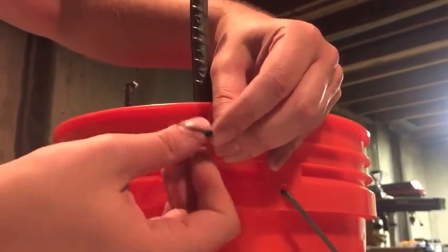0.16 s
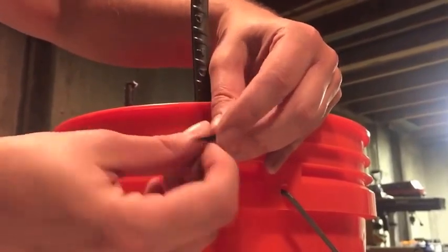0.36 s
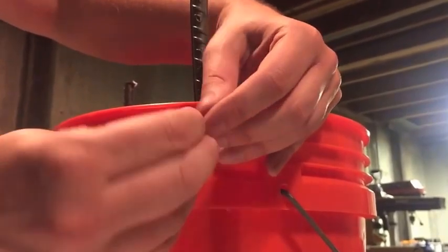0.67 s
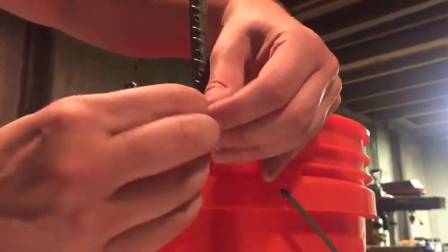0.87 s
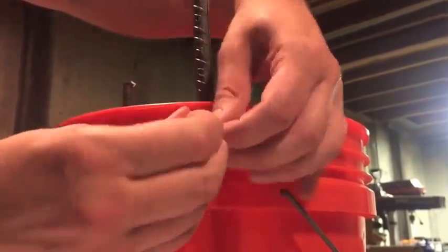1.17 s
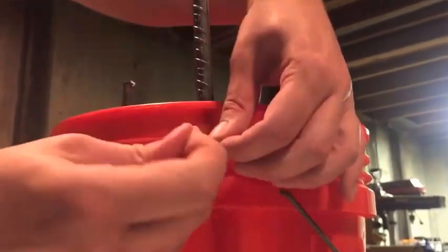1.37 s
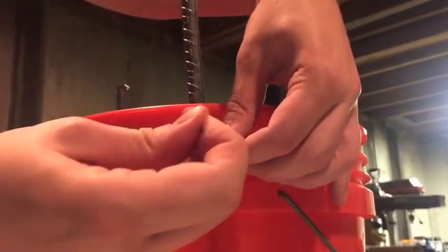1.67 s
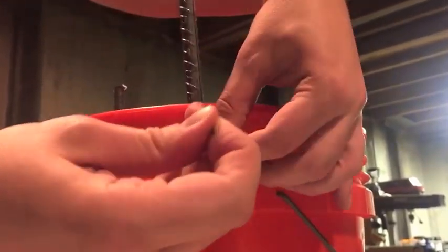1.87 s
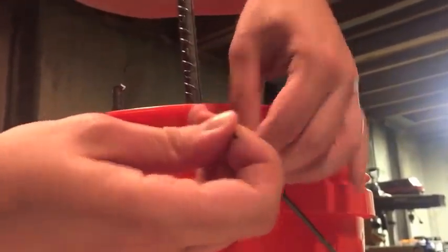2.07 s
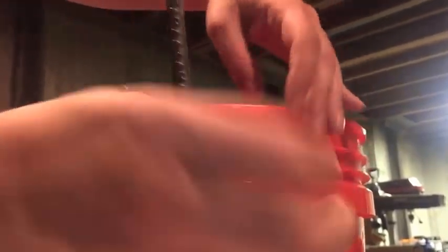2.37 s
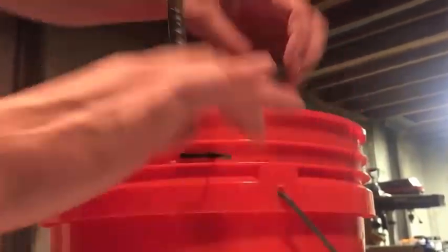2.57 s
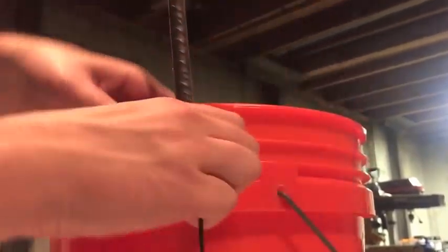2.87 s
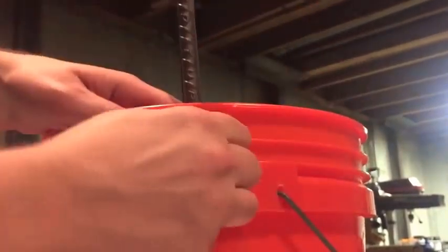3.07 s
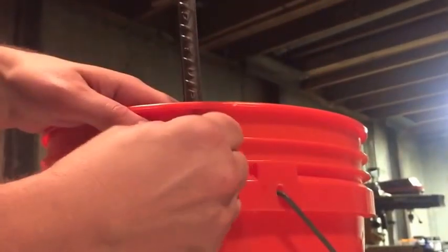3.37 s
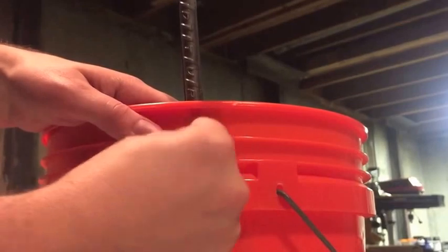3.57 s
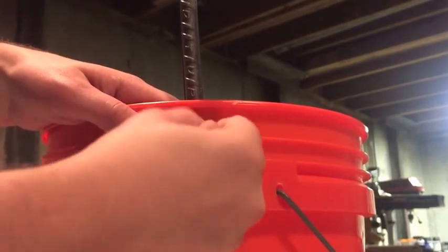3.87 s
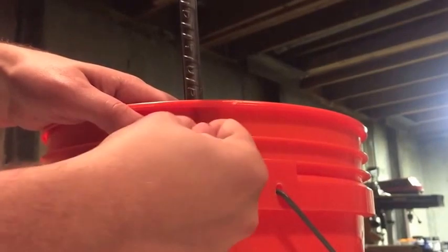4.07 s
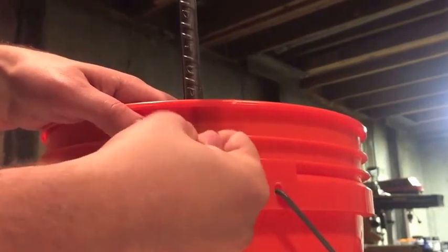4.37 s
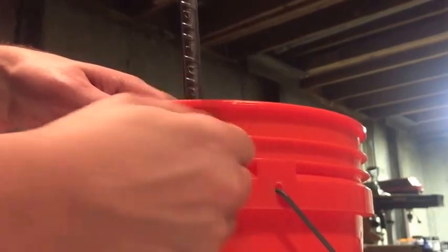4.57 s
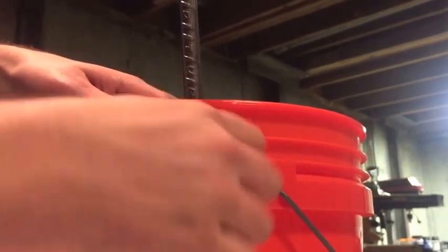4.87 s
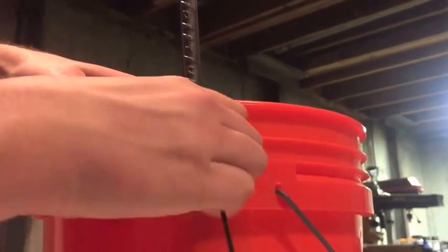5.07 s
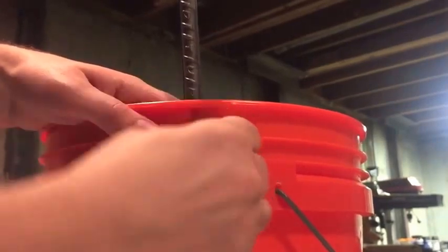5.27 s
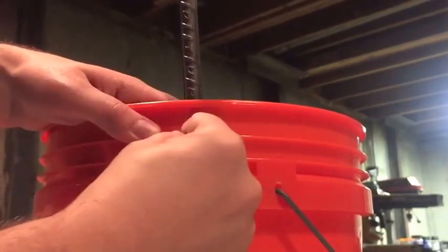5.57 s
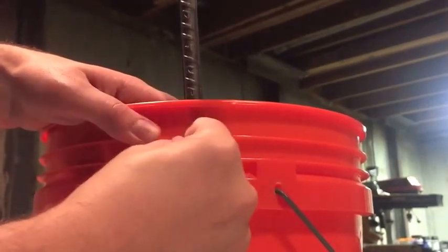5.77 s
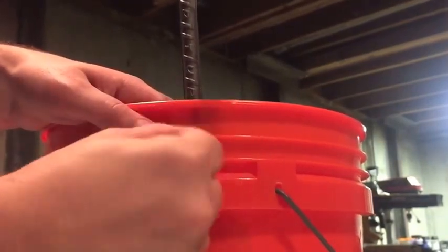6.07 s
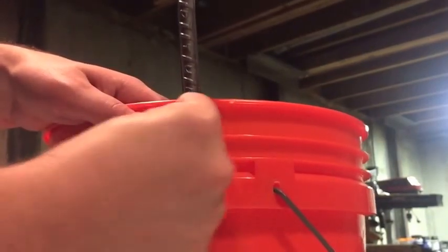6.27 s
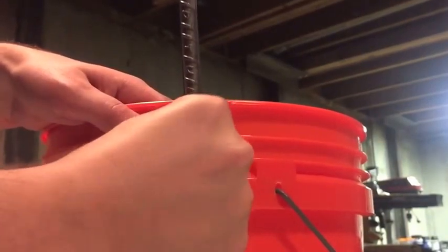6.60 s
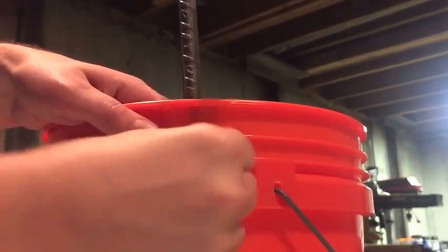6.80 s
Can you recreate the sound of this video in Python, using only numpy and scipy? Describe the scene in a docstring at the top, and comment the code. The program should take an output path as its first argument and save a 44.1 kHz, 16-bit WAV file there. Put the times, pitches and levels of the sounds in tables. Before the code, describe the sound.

Two zip ties ratchet tight on a hollow plastic bucket, one long and one short, with a pop and soft knocks in a quiet workshop.

```python
"""A quiet workshop, close up: two plastic zip ties are pulled tight round a steel bar and a bucket rim.
The pawl snaps over each tooth of the strap and shakes the plastic bucket: one long rasp on a slack
loop, later a short hard one on a tight loop. Hands press, rub, creak on and bump the bucket.
The bar knocks the wall and later clinks once; a tie pops against the rim. Faint hiss and hum behind."""
import sys
import numpy as np
from scipy import signal
from scipy.fft import rfft, irfft
from scipy.io import wavfile
from scipy.ndimage import uniform_filter1d

SR = 44100
rng = np.random.default_rng(int(sys.argv[2]) if len(sys.argv) > 2 else 0)


def generate_wav(sig):
    """Save sig (samples, or channels by samples) to the path in sys.argv[1] as 16-bit PCM at SR."""
    pcm = np.round(np.clip(np.atleast_2d(sig).T, -1, 1) * 32767).astype(np.int16)
    wavfile.write(sys.argv[1], SR, pcm)


N = 306054

# Spectra. Each row: frequency in Hz, level in dB.
AIR_SPECTRUM = [(12, -42.5), (20, -13), (43, -2), (65, -9.5), (101, -12.5), (158, -12), (527, -28.5),
                (825, -29), (1150, -29), (3160, -33), (4940, -37), (8650, -39), (10500, -42.5),
                (14300, -42), (16000, -49.5)]
PRESS_SPECTRUM = [(25, -18), (70, 7), (100, -11.5), (145, 0), (220, -1.5), (300, -17), (500, -21),
                  (900, -38), (3000, -61.5)]  # bucket flexing under a hand
RUB_SPECTRUM = [(200, -23.5), (450, 4), (660, -22.5), (920, 0.5), (1250, -7), (1600, -4.5), (2100, -12.5),
                (4000, -28.5), (16000, -50)]  # finger on the bucket
SCRAPE_SPECTRUM = [(600, -12.5), (1600, 0), (2400, 4), (3400, 2), (4500, -10), (5600, -7), (6700, -5),
                   (9000, -11.5), (10500, -16), (16000, -18)]  # finger on the strap
FLEX_SPECTRUM = [(40, -26), (110, -15), (180, -0.5), (260, -7), (340, -10.5), (600, -21.5), (1500, -36.5)]  # bucket flexing under a tooth
PAWL_SLACK_SPECTRUM = [(500, -5), (2000, -3), (3200, -18), (5500, -10.5), (7200, -10), (8000, -12),
                       (9300, -3.5), (10500, -7.5), (13000, 1), (15300, 7.5), (16200, -7.5)]
PAWL_SNUG_SPECTRUM = [(500, -16), (2400, -3.5), (3600, 3.5), (5200, -5.5), (7000, 0), (8600, -2),
                      (10500, -10), (12000, 0), (13500, 1.5), (15300, 0.5), (16200, -11)]
PAWL_HARD_SPECTRUM = [(500, -13), (2000, -17), (3500, 10), (4400, -16), (5450, 5), (5950, -9), (6400, 3),
                      (6700, 2), (7050, 11), (7600, 2), (8600, 4), (9400, 14), (10600, -6), (13000, -5),
                      (15500, -6)]
PAWL_PINNED_SPECTRUM = [(500, -9), (2000, -13), (3600, 11.5), (4400, -2), (5450, 5), (5950, -8), (6400, 10),
                        (6700, 6), (7050, 14.5), (7600, -16), (9200, 3), (10600, -4), (15500, -5)]  # no give left in the loop
WALL_SLACK_SPECTRUM = [(150, -17.5), (450, 4), (700, -11.5), (850, 7.5), (1250, 0.5), (1550, 2.5),
                       (2000, -3.5), (2500, -6), (3000, 1.5), (3700, -2), (5000, -10.5), (10000, -18),
                       (16000, -21)]  # bucket wall under a slack loop
WALL_TIGHT_SPECTRUM = [(150, -25), (450, -1), (680, -7), (900, 5), (1500, 5), (2700, 2), (3700, 2),
                       (4500, -5.5), (7000, -10.5), (11000, -15), (16000, -12)]

# Modes. Each row: frequency in Hz, level in dB, t60 in seconds.
BUCKET_MODES = [(72.2, -1, 0.28), (140.9, 3.5, 0.47), (175.2, -3, 0.11), (204.5, -1, 0.18),
                (235, -16, 0.023), (292, -6.5, 0.023), (368, -16, 0.12), (439, -11, 0.088)]
WALL_MODES = [(805.5, 7, 0.16), (938.7, 11, 0.06), (997, 4.5, 0.052), (1066, -2, 0.048), (1124, -3, 0.2),
              (1262, -5, 0.19), (1490, 5, 0.18), (1525, 5, 0.051), (1740, -9, 0.032), (2170, -2.5, 0.1),
              (2240, -1, 0.1), (2260, 1.5, 0.18), (2690, -9.5, 0.24), (3510, -11, 0.083)]
FREE_END_MODES = [(606, 1, 0.04), (1290, -1.5, 0.033)]
POP_MODES = [(870, -8.5, 0.098), (1489, 1.5, 0.027), (1670, 4, 0.017), (2670, -13, .02), (3040, -16, 0.033),
             (3255, -12.5, 0.049), (5130, -22, 0.035)]
BAR_MODES = [(585, 9, 0.025), (960, -15, 0.1), (2070, 2, 0.16), (2140, 3, 0.11), (2810, -8, 0.14),
             (4280, -1, 0.1), (4270, -1, 0.16), (4740, -10, 0.087)]

# Workshop hum. Each row: centre in Hz, width in Hz, level in dB.
HUM_BANDS = [(55, 5.9, -64), (144.6, 11, -77.5)]
# Reverberation. Each row: frequency in Hz, t60 in seconds.
ROOM_T60 = [(100, 0.73), (500, 0.16), (2000, 0.37), (5000, 0.21), (15000, 0.097)]
# Hands leaning on the bucket. Each row: start in seconds, hold in seconds, relative level in dB.
GRIPS = [(0, 0.019, -56), (1.87, 0.084, -53.5), (2.2, 0.25, -59), (2.87, 0.59, -61), (3.692, 0.23, -56),
         (4.23, 0.29, -58), (6.268, 0.38, -50)]
# Finger slides. Each row: start and length in seconds, relative level in dB, share on the strap 0-1.
SLIDES = [(0, 0.065, -70.5, 0.14), (.391, 0.041, -65.5, 0.01), (.84, 0.18, -69.5, 0),
          (2.067, 0.13, -64.5, 0.07), (2.3, 0.047, -54.5, 0.01), (2.37, 0.18, -61.5, 0),
          (2.918, 0.15, -55, 0.17), (3.277, 0.056, -66, 0.94), (3.75, 0.071, -61, 0.6),
          (6.34, 0.13, -67.5, 0.02), (4.9, 0.073, -64.5, 0.94), (5, 0.11, -69, 1), (5.411, 0.057, -68, 1),
          (5.85, 0.11, -69.5, 0.42), (6.045, 0.2, -73, 0.78), (6.17, 0.15, -66.5, 0.36),
          (6.713, 0.063, -68, 0.94), (6.88, .07, -68, 1)]
# Finger creaks, and one 2.3 kHz ring lingering after the hard pull.
# Each row: start and length in seconds, relative level in dB, start and end pitch in Hz.
CREAKS_AND_RING = [(0, 0.052, -67, 820, 820), (0.783, 0.043, -71, 1340, 1380),
                   (0.85, 0.076, -71.5, 2207, 1740), (2.09, 0.046, -66, 910, 950),
                   (2.5, 0.047, -64.5, 1582, 1498), (2.956, 0.071, -56, 1770, 1380),
                   (3.683, 0.091, -61, 2300, 2240), (4.903, 0.052, -67, 3460, 3100),
                   (4.993, 0.046, -67, 2330, 2500), (6.086, 0.021, -63.5, 9200, 8700),
                   (6.227, 0.076, -69.5, 1050, 920), (6.744, 0.022, -62.5, 1420, 1350),
                   (6.843, 0.029, -61.5, 1300, 1310)]
# Overlapping tugs of the long pull. Each row: peak time and half length in seconds,
# peak teeth per second, force on the pawl and on the bucket in dB.
TUGS = [(1.076, .019, 133, 4, -2), (1.179, .0526, 250, 4, -1), (1.289, .0462, 302, 1, 0.5),
        (1.409, .0803, 183, 2.5, 0), (1.565, .0395, 269, 7, -5.5), (1.703, .1417, 121, -3, -3),
        (1.827, .0362, 130, 8.5, 4)]
# A slow tooth sticks and lets go harder. Each row: teeth per second, gain in dB.
TOOTH_STICK = [(10, 4), (60, -1.5)]
# Bar against the wall. Each row: start in seconds, relative level in dB, centre in Hz.
BAR_KNOCKS = [(1.305, -10, 970), (1.463, -15.5, 860), (1.745, -13, 970), (2.318, -17.5, 1170)]
# Bumps on the bucket. Each row: start in seconds, relative level in dB, hardness 0-1, extra boom in dB.
BUMPS = [(2.199, -3.5, 0.28, -1.5), (2.273, -7, 0.24, -3.5), (2.468, -20.5, 0.37, -2.5),
         (3.041, -24.5, 1, -6), (2.873, -15.5, 0.34, -2), (2.927, -8.5, 0.62, -3.5),
         (2.97, -14.5, 0.55, -9), (3.031, -16, 0.57, 1), (3.185, -8, 0.09, -1.5), (3.358, -14.5, 0, 0),
         (3.545, -16, 0, 2), (4.102, -24.5, 0.58, 0.5), (4.1863, -12, 0.52, -3.5), (4.25, -12.5, 0, 1.5),
         (4.278, -15.5, 0, -0.5), (4.4914, -9, 0.59, -7), (4.5, -15, .45, -2), (4.522, -9, 0.14, 2),
         (4.558, -13.5, 0, 0.5), (5.3413, -18, 1, 0), (5.769, -21, 0.21, -3), (5.953, -10.5, 0, -1),
         (6.0018, -16.5, 0.79, 2.5), (6.286, -16, 0.3, 1), (6.376, -11.5, 0.21, 4.5),
         (6.394, -18, 0.45, 2.5), (6.505, -21, 0.51, 8), (6.649, -18.5, 0.36, 3.5), (6.736, -24, 0.55, -1),
         (6.841, -16, 0.58, -2)]
# Contacts: flesh, fingertip, nail, up to the strap's tip.
# Each row: hardness 0-1, knock centre in Hz, gains of knock, tick and boom in dB.
CONTACTS = [(0, 1190, -45.5, -51, -0.5), (.3, 910, -16, -60, 2), (.5, 1110, -13, -34.5, -0.5),
            (.6, 1450, -10.5, -18, 3.5), (1, 2080, -12.5, -11, -23)]
# Teeth of the hard pull. Each row: start in seconds, force on the pawl and on the bucket in dB.
CRACKS = [(3.4508, 0, -3.5), (3.4617, -2, -2.5), (3.4722, -2, 1), (3.4806, -4, -3), (3.4907, -2.5, -2.5),
          (3.5077, -3.5, -0.5), (3.5345, 0.5, -2), (3.549, 4, -2), (3.559, 5, -2.5), (3.568, 1, 0.5),
          (3.5791, 2.5, -1.5), (3.59, -6, 0.5), (3.601, 1.5, 0), (3.6153, -6, 0.5), (3.64, 0, -2),
          (3.6766, -4, -5.5)]
# The boom sinks as the loop pins the bucket. Each row: time in seconds, frequency in Hz.
BOOM_GLIDE = [(3.49, 250), (3.56, 168.5)]

BAND_LIMIT_HZ = 16000
CLATTER_T60_S = .045


def gain_of(db):
    return 10 ** (np.asarray(db) / 20)


def unit_rms(x):
    return x / np.sqrt(np.mean(x ** 2) + 1e-20)


def unit_energy(x):
    return x / np.sqrt(np.sum(x ** 2) + 1e-20)


def at_hz(points, hz):
    """Table lookup on a log-frequency axis."""
    f, value = np.transpose(points)
    return np.interp(np.log(hz + 1), np.log(f + 1), value)


def add(mix, start_s, sound):
    part = mix[max(round(start_s * SR), 0):][:len(sound)]
    part += sound[:len(part)]


def colour(x, spectrum, size=4096):
    """Minimum-phase filter; attacks stay sharp."""
    log_gain = np.log(gain_of(at_hz(spectrum, abs(np.fft.fftfreq(size, 1 / SR)))))
    taps = np.fft.ifft(np.exp(np.conj(signal.hilbert(log_gain)))).real[:size // 2]
    return signal.fftconvolve(x, taps)[:len(x)]


def burst(spectrum, t60_s, size=8192):
    """Dense modes struck once: decaying noise, flattened, then coloured."""
    bins = rfft(rng.standard_normal(size) * gain_of(-60 * np.arange(size) / SR / t60_s))
    bins /= np.sqrt(uniform_filter1d(abs(bins) ** 2, size=max(int(8 * size / SR / t60_s), 3)))
    fade = signal.windows.tukey(2 * size, .5)[size:]
    return unit_energy(colour(irfft(bins, size) * fade, spectrum))


def ring(modes, spread_db=0, size=8192):
    """Damped modes; strengths scatter with the place struck."""
    t, out = np.arange(size) / SR, np.zeros(size)
    for k, (hz, db, t60_s) in enumerate(modes):
        wave = unit_energy(np.sin(2 * np.pi * hz * t) * np.exp(-np.log(1000) * t / t60_s))
        out += gain_of(db + spread_db * rng.standard_normal()) * (-1) ** k * wave
    return unit_energy(out)


def snap(spectrum, t60_s, rattle, size=8192):
    """Sharp release, then a brief rattle of plastic."""
    release = unit_energy(colour(signal.unit_impulse(size), spectrum))
    return unit_energy(release + rattle * burst(spectrum, t60_s))


def soften(sound, rise_s):
    """A yielding contact builds up gradually."""
    return unit_energy(sound * -np.expm1(-np.arange(len(sound)) / SR / rise_s))


def background(hiss_above_300_hz_db=-73.5):
    """Steady hiss and wavering low hum."""
    air = colour(rng.standard_normal(N), AIR_SPECTRUM)
    air /= np.std(signal.sosfilt(signal.butter(4, 300, "high", fs=SR, output="sos"), air))
    hz, hum = np.fft.rfftfreq(N, 1 / SR), np.zeros(N)
    for centre_hz, width_hz, db in HUM_BANDS:
        band = rfft(rng.standard_normal(N)) / (1 + (2 * (hz - centre_hz) / width_hz) ** 2)
        hum += gain_of(db) * unit_rms(irfft(band, N))
    return gain_of(hiss_above_300_hz_db) * air + hum


def hand_rumble(gain_db=-2, attack_s=0.0034, release_db_per_s=126):
    """Shifting pressure rumbles the bucket; each grip comes on, holds, lets go."""
    pressure = rng.standard_normal(N)
    flex = unit_rms(colour(pressure, PRESS_SPECTRUM))
    boom = unit_rms(signal.fftconvolve(pressure, ring(BUCKET_MODES))[:N])
    t, weight = np.arange(N) / SR, np.zeros(N)
    for s, hold_s, db in GRIPS:
        attack = np.clip((t - s) / attack_s, 0, 1)
        weight += attack * gain_of(db - release_db_per_s * np.maximum(t - s - hold_s, 0))
    return gain_of(gain_db) * weight * unit_rms(flex + 0.35 * boom)


def strokes(skid_lead_s=0.022, skid_s=0.034, skid_db=-41, fidgets_per_s=2.5, fidget_db=-82.5):
    """SLIDES plus a skid at each bump and faint random fidgets."""
    skids = [(s - skid_lead_s, skid_s, db + contact(hardness)[1] + skid_db, hardness ** 2)
             for s, db, hardness, _ in BUMPS]
    fidgets = [(when * N / SR, 0.13 * (.5 + length), fidget_db, share)
               for when, length, share in rng.random((round(fidgets_per_s * N / SR), 3))]
    return SLIDES + skids + fidgets


def finger_slides(gain_db=-1, slips_per_s=2500, ribs_per_s=260, catch_s=0.013, catch_db=3.5):
    """Tiny slips ring the wall and hiss on the ribbed strap; the finger catches and lets go."""
    slipping = rng.random(N) < slips_per_s / SR
    slips = slipping * gain_of(3 * np.minimum(rng.exponential(1, N), 4)) * rng.choice([-1, 1], N)
    ringing = unit_rms(signal.fftconvolve(slips, ring(WALL_MODES))[:N])
    rub = unit_rms(unit_rms(colour(slips, RUB_SPECTRUM)) + 0.77 * ringing)
    ribs = (rng.random(N) < ribs_per_s / SR) * rng.standard_normal(N)
    scrape = unit_rms(colour(unit_rms(slips) + unit_rms(ribs), SCRAPE_SPECTRUM))
    on_bucket, on_strap = np.zeros(N), np.zeros(N)
    for s, length_s, db, share in strokes():
        swell = gain_of(db + gain_db) * unit_rms(signal.windows.tukey(int(length_s * SR), .7))
        add(on_bucket, s, np.sqrt(1 - share) * swell)
        add(on_strap, s, np.sqrt(share) * swell)
    catches = np.interp(np.arange(N) / SR / catch_s, np.arange(N), rng.standard_normal(N))
    return (on_bucket * rub + on_strap * scrape) * unit_rms(gain_of(catch_db * catches))


def resonate(x, hz, width_hz):
    """Resonance tracking the curve hz."""
    turn, r = np.exp(2j * np.pi * np.cumsum(hz) / SR), np.exp(-np.pi * width_hz / SR)
    return (turn * signal.lfilter([(1 - r) ** 2], [1, -2 * r, r * r], x / turn)).real


def creaks_and_ring(gain_db=-1, pulses_per_s=450, uneven_db=4, relative_width=0.12):
    """Uneven pulses drive two gliding resonances: stick-slip creaks, and a ring after the hard pull."""
    out = np.zeros(N)
    for s, length_s, db, start_hz, end_hz in CREAKS_AND_RING:
        swell = signal.windows.tukey(int(length_s * SR), .7)
        jitter, force, rough = rng.standard_normal((3, SR))[:, :len(swell)]
        cycles = np.maximum.accumulate(np.cumsum(pulses_per_s * (1 + 3 * jitter)) / SR)
        pulses = np.diff(np.floor(cycles), prepend=0) * gain_of(uneven_db * force) + .03 * rough
        hz, tone = np.linspace(start_hz, end_hz, len(swell)), 0
        for ratio, partial_db in [(1, 9), (2.05, -9)]:
            partial = resonate(pulses, ratio * hz, relative_width * ratio * start_hz)
            tone += gain_of(partial_db) * unit_rms(partial)
        add(out, s, gain_of(db + gain_db) * unit_rms(swell * tone))
    return out


def teeth(start_s=1.0581, end_s=1.9226):
    """Tugs sum to strap speed. Each row: seconds, teeth per second, share drawn, pawl dB, bucket dB."""
    t = np.arange(start_s, end_s, 1 / SR)
    speeds = np.array([peak * np.exp(-((t - s) / half_s) ** 2) for s, half_s, peak, *_ in TUGS])
    teeth_per_s = speeds.sum(0) + 1e-9
    pawl_db, bucket_db = np.array(TUGS)[:, -2:].T @ speeds / teeth_per_s
    passed = np.cumsum(teeth_per_s) / SR
    drawn = np.linspace(0, 1, round(passed[-1]) + 1)
    at = np.searchsorted(passed / passed[-1], drawn)
    return zip(t[at], teeth_per_s[at], drawn, pawl_db[at], bucket_db[at])


def loop_ring(slack_hz, mode_db, drawn, rise_oct=1.0, t60_s=.008, size=1024):
    """Bending modes of the loop: higher and weaker as it shrinks."""
    hz, t = slack_hz * 2 ** (rise_oct * drawn), np.arange(size) / SR
    strength = gain_of(mode_db + 4 * rng.standard_normal(len(hz))) * (-1) ** np.arange(len(hz))
    waves = (strength * (hz < BAND_LIMIT_HZ)) @ np.sin(2 * np.pi * hz[:, None] * t)
    return (1 - 0.82 * drawn) * unit_energy(waves * np.exp(-np.log(1000) * t / t60_s))


def pawl_click(loop, snug):
    """The pawl's release rings the loop; snug 0-1 shifts its colour."""
    rattle = burst([(500, 0), (16000, 0)], t60_s=.006, size=1024)
    release = signal.unit_impulse(1024) + 1.05 * loop + .5 * rattle
    slack_click = unit_energy(colour(release, PAWL_SLACK_SPECTRUM))
    snug_click = unit_energy(colour(release, PAWL_SNUG_SPECTRUM))
    return unit_energy((1 - snug) * slack_click + snug * snug_click)


def wall_response(spectrum, modes_db):
    """Dense clatter of the bucket wall plus its clearest modes."""
    clatter = burst(spectrum, CLATTER_T60_S)
    return unit_energy(clatter + gain_of(modes_db) * ring(WALL_MODES, spread_db=3.8))


def wall_shake(spots, drawn, loose_treble_db=-10):
    """The strap creeps from spot to spot on the wall; a loose loop passes on little treble."""
    position = drawn * (len(spots) - 1)
    wall = unit_energy(sum(max(1 - abs(position - k), 0) * spot for k, spot in enumerate(spots)))
    wall = unit_energy(wall + .55 * burst(WALL_TIGHT_SPECTRUM, t60_s=.008))
    return unit_energy(colour(wall, [(2100, 0), (3600, loose_treble_db * (1 - drawn) ** 2)], size=1024))


def free_end_groan(drawn, fall_oct=2.067, wobble_oct=0.16):
    """The free end's modes fall as it lengthens and wobble with the hand."""
    sag_oct = fall_oct * drawn + wobble_oct * rng.standard_normal()
    return ring([(hz / 2 ** sag_oct, db, t60_s) for hz, db, t60_s in FREE_END_MODES], spread_db=5.8)


def long_pull(click_db=-19, wall_db=-18, groan_db=-31, boom_db=-34, hurry_db_per_hz=-0.0223,
              loop_modes=42, loop_spacing_hz=390):
    """Teeth pass the pawl at hand speed, lighter when hurried; the shrinking loop grips the bucket."""
    spots = [wall_response(WALL_SLACK_SPECTRUM, modes_db=-1) for _ in range(8)]
    loop_hz = loop_spacing_hz * (np.arange(loop_modes) + 1 + .6 * rng.random(loop_modes))
    loop_db = 4 * rng.standard_normal(loop_modes)
    flex, out = burst(FLEX_SPECTRUM, t60_s=0.056), np.zeros(N)
    for s, teeth_per_s, drawn, pawl_db, bucket_db in teeth():
        s += .00006 * rng.standard_normal()
        stick_db = np.interp(teeth_per_s, *np.transpose(TOOTH_STICK))
        tooth_db = pawl_db + stick_db + hurry_db_per_hz * teeth_per_s + 2.5 * rng.standard_normal()
        shake_db = bucket_db + stick_db + 2.5 * rng.standard_normal()
        loop = loop_ring(loop_hz, loop_db, drawn + .02 * rng.standard_normal())
        snug = np.interp(s, [1.49, 1.62], [0, 1])
        add(out, s, gain_of(click_db + tooth_db - 4 * drawn) * pawl_click(loop, snug))
        add(out, s, gain_of(wall_db + shake_db - drawn) * wall_shake(spots, drawn))
        add(out, s, gain_of(groan_db + stick_db + 5 * drawn) * free_end_groan(drawn))
        boom = unit_energy(flex + 0.67 * burst(FLEX_SPECTRUM, t60_s=0.077))
        add(out, s, gain_of(boom_db + bucket_db + 14 * drawn ** 2) * boom)
    return out


def wall_knock(hz, held_t60_s=0.21):
    """A harder contact rings the wall higher and shorter; the holding hand damps it."""
    spectrum = [(hz / 8, -24), (hz / 3.1, -12), (hz, 0), (hz * 2, -12), (hz * 8, -38.4)]
    held_modes = [(f, db, 1 / (1 / t60_s + 1 / held_t60_s)) for f, db, t60_s in WALL_MODES]
    ringing = unit_energy(colour(ring(held_modes, spread_db=1), spectrum))
    clatter = burst(spectrum, t60_s=0.042 * 1300 / hz)
    return soften(clatter + (800 / hz) * ringing, rise_s=0.0008 * (900 / hz) ** 4)


def bar_knocks(gain_db=-1):
    """The bar strikes the bucket wall."""
    out = np.zeros(N)
    for s, db, hz in BAR_KNOCKS:
        add(out, s, gain_of(db + gain_db) * wall_knock(hz))
    return out


def contact(hardness):
    """Knock centre in Hz, then knock, tick and boom gains in dB."""
    steps, *columns = np.transpose(CONTACTS)
    return [np.interp(hardness, steps, column) for column in columns]


def bucket_boom(push_db, hardness, heavy_db=-12, nail_s=0.00043, flesh_s=0.0044):
    """Low modes, detuned by the hand's load. A heavy push rocks the lowest; flesh muffles the upper."""
    load = np.exp(.03 * rng.standard_normal())
    modes = ring([(hz * load, db, t60_s) for hz, db, t60_s in BUCKET_MODES], spread_db=4.7)
    boom = modes + 0.83 * burst(PRESS_SPECTRUM, t60_s=0.084)
    softness = (1 - hardness) ** 4
    tilt = [(80, 0.1 * max(push_db - heavy_db, 0)), (140, 0.0071), (230, 0), (450, -8 * softness)]
    return soften(colour(boom, tilt), rise_s=nail_s + flesh_s * softness)


def bumps(gain_db=-1):
    """Hard contacts tick and ring the wall; soft flesh pushes the low modes."""
    out = np.zeros(N)
    for s, db, hardness, lean_db in BUMPS:
        hz, knock_db, tick_db, boom_db = contact(hardness)
        add(out, s, gain_of(db + knock_db) * wall_knock(hz))
        tick = snap([(1000, -18), (3500, -4.5), (7000, -7), (16000, -24)], t60_s=0.011, rattle=2)
        add(out, s, gain_of(db + tick_db) * tick)
        add(out, s, gain_of(db + boom_db + lean_db) * bucket_boom(db, hardness))
    return gain_of(gain_db) * out


def tie_pop(start_s=2.4025, energy_db=-9.5, tick_db=-18, rattle_db=-6):
    """The tie slips into its seat with a hollow pop; the rim rattles."""
    out = np.zeros(N)
    tick = snap([(1000, -4), (3000, -3), (7000, 12), (16000, -35)], t60_s=0.021, rattle=1)
    rim_spectrum = [(300, -16), (900, -3.5), (1650, 6), (2200, -9), (3200, -11), (8000, -31.5)]
    rattle = burst(rim_spectrum, t60_s=0.07)
    pop = ring(POP_MODES) + gain_of(tick_db) * tick + gain_of(rattle_db) * rattle
    add(out, start_s, gain_of(energy_db) * unit_energy(pop))
    return out


def hard_pull(crack_db=-13.5, wall_db=-11, boom_db=-9):
    """Under high tension each tooth is a separate crack that kicks the whole bucket."""
    wall, out = wall_response(WALL_TIGHT_SPECTRUM, modes_db=-12), np.zeros(N)
    for (s, pawl_db, bucket_db), drawn in zip(CRACKS, np.linspace(0, 1, len(CRACKS))):
        pinned = np.interp(s, [3.48, 3.55], [0, 1])
        hard_snap = snap(PAWL_HARD_SPECTRUM, t60_s=.008, rattle=1.6)
        pinned_snap = snap(PAWL_PINNED_SPECTRUM, t60_s=.008, rattle=1.6)
        crack = unit_energy((1 - pinned) * hard_snap + pinned * pinned_snap)
        add(out, s, gain_of(crack_db + pawl_db - 5.5 * drawn) * crack)
        shake = unit_energy(wall + burst(WALL_TIGHT_SPECTRUM, t60_s=.014))
        add(out, s, gain_of(wall_db + bucket_db + drawn) * shake)
        boom = ring([(np.interp(s, *np.transpose(BOOM_GLIDE)), 0, .07)])
        flex = 0.69 * burst(FLEX_SPECTRUM, t60_s=0.051) + 0.54 * burst(PRESS_SPECTRUM, t60_s=0.14)
        add(out, s, gain_of(boom_db + bucket_db - 4 * drawn) * soften(boom + flex, rise_s=0.0022))
    return out


def bar_clink(start_s=6.109, energy_db=-22.5):
    """The grazed steel bar rings faintly."""
    out = np.zeros(N)
    spectrum = [(400, -3), (2000, -2), (4400, 0), (5200, -8), (7000, -16), (16000, -28)]
    scratch = burst(spectrum, t60_s=.09, size=32768)
    clink = soften(ring(BAR_MODES, size=32768) + 0.67 * scratch, rise_s=0.002)
    add(out, start_s, gain_of(energy_db) * clink)
    return out


def reflections(x, delay_s=.008):
    """Diffuse room tail; each band decays at its own rate."""
    hz, t, bands = signal.stft(rng.standard_normal(SR), SR, nperseg=256)
    decay = np.exp(-np.log(1000) * t / at_hz(ROOM_T60, hz)[:, None])
    tail = unit_energy(signal.istft(bands * decay, SR, nperseg=256)[1])
    tail = colour(tail, [(100, -9.5), (500, -7), (2000, -11.5), (6000, -11), (15000, -6)])
    out = np.zeros(N)
    add(out, delay_s, signal.fftconvolve(x, tail))
    return out


def scene():
    """Close sounds, their reflections and the background, in mono."""
    near = long_pull() + hard_pull() + bumps() + bar_knocks() + tie_pop() + bar_clink()
    near += hand_rumble() + finger_slides() + creaks_and_ring()
    return (near + reflections(near) + background())[None]


def record(dry):
    """Bass roll-off and band limit."""
    thinned = signal.sosfilt(signal.butter(3, 38, "high", fs=SR, output="sos"), dry)
    lowpass = signal.firwin(401, BAND_LIMIT_HZ, window=("kaiser", 8), fs=SR)
    return signal.oaconvolve(thinned, lowpass[None], "same")


dry = scene()
out = record(dry)
generate_wav(out)
```